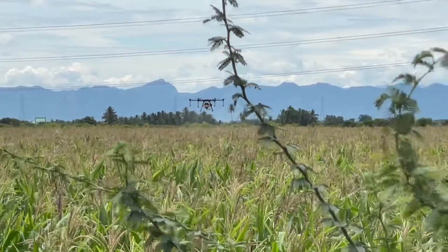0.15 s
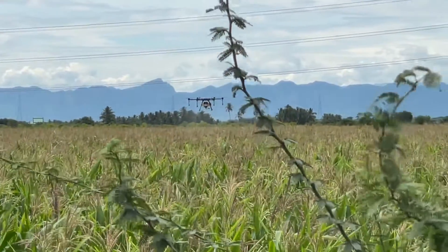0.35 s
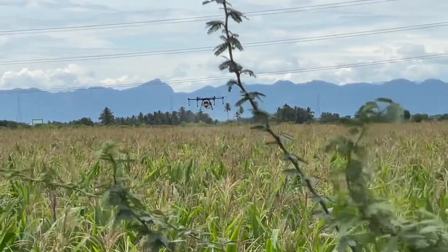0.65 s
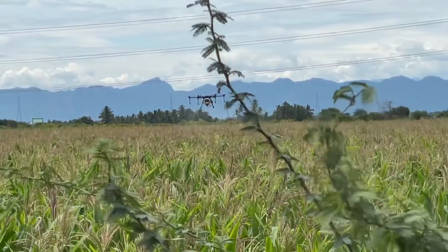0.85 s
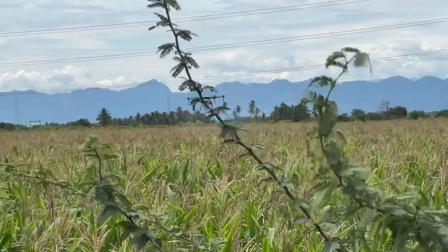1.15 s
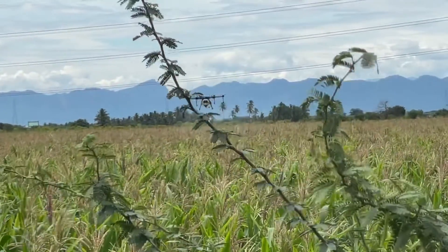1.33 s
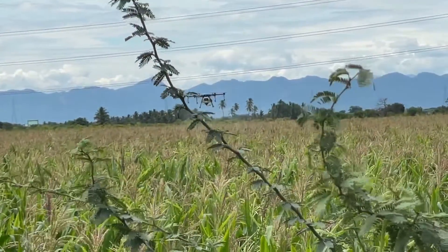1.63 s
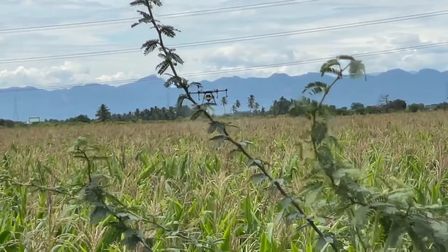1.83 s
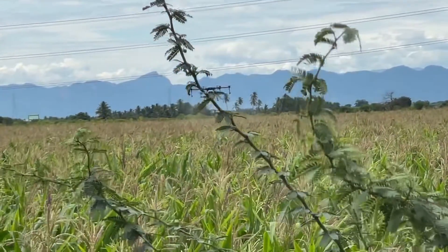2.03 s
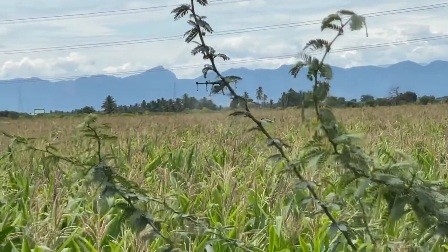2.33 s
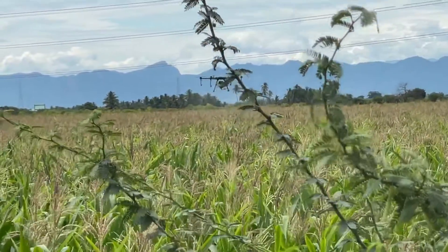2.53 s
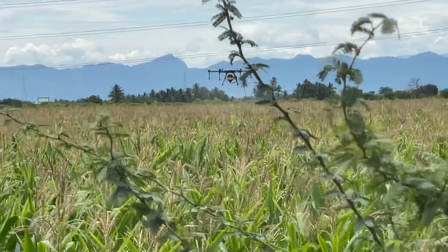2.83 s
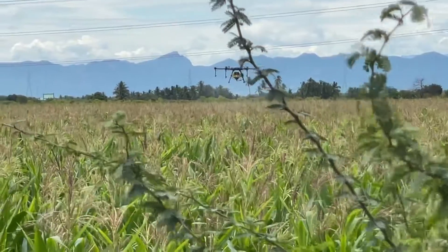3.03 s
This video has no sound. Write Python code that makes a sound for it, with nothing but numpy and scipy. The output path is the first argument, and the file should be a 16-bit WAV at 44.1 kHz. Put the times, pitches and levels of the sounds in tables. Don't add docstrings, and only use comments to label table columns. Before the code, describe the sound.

Distant drone rotors hum and hiss steadily, with close engine knocking, gusty wind and faint bird twitter.

```python
import sys
import numpy as np
from scipy import signal
from scipy.fft import rfft, irfft
from scipy.io import wavfile
from scipy.ndimage import uniform_filter1d

SR = 44100
rng = np.random.default_rng(int(sys.argv[2]) if len(sys.argv) > 2 else 0)


def store_wav(level_fs):
    pcm = np.round(np.clip(np.atleast_2d(level_fs), -1, 1) * 32767)
    wavfile.write(sys.argv[1], SR, pcm.T.astype(np.int16))


def undo_db(level):
    steps = np.asarray(level, float) / 20
    return 10 ** steps


N = 140238

CYCLE_S = .19623
LEAD = int(CYCLE_S * SR)
KNOCK_JITTER_S, KNOCK_SPREAD_DB, MODE_SPREAD_DB = .00006, 1.0, 1.2


def rms_one(x):
    return x / np.sqrt(np.mean(x ** 2) + 1e-20)


def drift(rate):
    r = np.exp(-80 * np.pi * rate / SR)
    slow = signal.lfilter([1], [1, -2 * r, r * r], rng.standard_normal(N // 40 + 2002))[2000:]
    return np.interp(np.arange(N) / 40, np.arange(len(slow)), rms_one(slow - slow.mean()))


def noise(spectrum, shared_db, own_db, rate):
    hz, db = np.transpose(spectrum)
    octave = np.log2(np.maximum(np.arange(N // 2 + 1) * SR / N, 1))
    white = rfft(rng.standard_normal((2, N)))
    coloured = white * undo_db(np.interp(octave, np.log2(hz), db, -99, -99))
    out, together = 0, drift(rate)
    for centre in np.arange(np.log2(hz[0]), np.log2(hz[-1]) + .5, .5):
        overlap = np.clip(1 - 2 * abs(octave - centre), 0, 1)
        band = irfft(coloured * overlap, N)
        out = out + band * undo_db(shared_db * together + own_db * drift(2 * rate))
    return rms_one(out)


def ring(clicks, hz, t60):
    r, w = undo_db(-60 / (t60 * SR)), 2 * np.pi * hz / SR
    return signal.lfilter([0, np.sin(w)], [1, -2 * r * np.cos(w), r * r], clicks + 1e-18)


def looped(rows, jitter_s, spread_db):
    s, db = np.transpose(rows)[:2]
    count = int(N / SR / CYCLE_S) + 2
    luck = rng.standard_normal((count, 2, len(s)))
    at = s + CYCLE_S * np.arange(count)[:, None] + jitter_s * luck[:, 0]
    return (np.abs(at) * SR).astype(int), db + spread_db * luck[:, 1]


def train(at, heights):
    clicks = np.zeros(N + SR)
    np.add.at(clicks, at.ravel(), np.ravel(heights))
    return clicks


def decay(clicks, time_s):
    swell = signal.lfilter([1], [1, -np.exp(-1 / (time_s * SR))], clicks)[LEAD:LEAD + N]
    return swell / swell.max()


def burst(rows, cycles):
    t, out = np.arange(N) / SR, np.zeros(N)
    for at, db, hz in rows:
        age = np.clip((t - at) * hz / cycles, 0, 1)
        envelope = np.sin(np.pi * age ** 0.62) ** 2
        out += undo_db(db - 3) * envelope * np.sin(2 * np.pi * cycles * age)
    return out


def bird():
    # (time [s], length [s], start pitch [Hz], end pitch [Hz], level [dB])
    twitter = [(.338, .022, 4100, 4200, -56), (.365, .025, 4850, 4300, -60), (.425, .022, 4350, 4500, -59),
               (.452, .058, 4750, 6450, -58), (.672, .02, 4100, 4150, -58), (.7, .022, 4750, 4350, -55),
               (.805, .018, 5200, 5550, -60), (.83, .018, 5900, 6300, -62), (1.015, .024, 4080, 4150, -55),
               (1.045, .024, 4900, 4450, -56), (1.1, .025, 4300, 4450, -59), (1.13, .035, 4950, 5100, -58),
               (1.17, .022, 6100, 6250, -59), (1.36, .02, 4050, 4100, -57), (1.475, .03, 5050, 5050, -56),
               (1.51, .03, 5900, 6400, -60), (1.49, .02, 4150, 4200, -57), (1.525, .022, 5000, 4950, -56)]
    t, out = np.arange(N) / SR, np.zeros(N)
    for at, length, from_hz, to_hz, db in twitter:
        age = np.clip((t - at) / length, 0, 1)
        turns = length * (from_hz * age + (to_hz - from_hz) * age ** 2 / 2)
        out += undo_db(db + 2.0) * np.sin(np.pi * age ** 1.64) * np.sin(2 * np.pi * turns)
    return out


def drone(swell):
    # (frequency [Hz], level per Hz [dB])
    hum_colour = [(45, -26), (90, -6), (200, -3), (300, -9), (480, -11.5), (600, -18), (800, -23),
                  (1300, -30)]
    # (frequency [Hz], level per Hz [dB])
    wash_colour = [(700, -6), (1100, 0.5), (1500, 0), (1850, -3), (2100, -6), (2700, -7), (3700, -8),
                   (4300, -14.5)]
    # (frequency [Hz], level per Hz [dB])
    hiss_colour = [(3500, -18), (4500, 2.5), (6500, -0.5), (8500, -0.5), (9800, 0.5), (11100, -1),
                   (11700, -14), (12400, -36)]
    # (time [s], level [dB])
    spray = [
        (0, 1),
        (.25, .5),
        (.5, -.5),
        (.95, -.5),
        (2.2, 0),
        (2.55, -.5),
        (2.8, 1),
        (2.95, 1.5),
        (3.18, 1),
    ]
    flicker_db, puff_db = .45, 4
    flow_db = np.interp(np.arange(N) / SR, *np.transpose(spray))
    hum = undo_db(-36.5) * noise(hum_colour, shared_db=.3, own_db=.4, rate=6.0)
    wash_level = undo_db(-50 + .8 * puff_db * swell)
    wash = wash_level * noise(wash_colour, flicker_db, 2 * flicker_db, rate=14.0)
    hiss_level = undo_db(-57.5 + flow_db + 0.97 * puff_db * swell)
    hiss = hiss_level * noise(hiss_colour, flicker_db, flicker_db, rate=17.0)
    return hum + wash + hiss


def wind():
    # (time [s], level [dB], sharpness [dB])
    gust = [(0, -26, 1.5), (.12, -28.5, -2), (.3, -26.5, -2), (.45, -28.5, 0.5), (.62, -27.5, -1),
            (1.0, -28.5, -3), (1.329, -29.5, 1.5), (1.38, -21, -2.5), (1.56, -27, 3.5), (1.7, -29, -1),
            (1.85, -28.5, 7.5), (2.0, -27.5, -0.5), (2.12, -26.5, -9), (2.22, -34.5, 4.5), (2.33, -43, 5),
            (2.7, -41.5, 5.5), (2.85, -42, 9.5), (3.18, -34.5, 0.5)]
    # (frequency [Hz], level per Hz [dB])
    low_colour = [(20, -40), (35, -17.5), (50, -2.5), (65, 1), (95, 0), (130, -8.5), (200, -14)]
    # (frequency [Hz], level per Hz [dB])
    edge_colour = [(60, -14), (110, -2), (160, 2), (250, -4.5), (400, -13.5), (700, -29)]
    # (time [s], peak level [dB], frequency [Hz])
    buffets = [(0.24, -16, 160), (0.255, -19, 190), (0.285, -13, 145), (0.309, -23, 177.8),
               (0.459, -27, 250), (0.53, -19, 151), (0.605, -16, 170.4), (0.769, -18, 202),
               (1.35, -17, 212), (1.384, -22, 179), (1.43, -20.5, 292), (1.489, -15.5, 180),
               (1.535, -17, 170), (1.665, -20.5, 167.4), (1.74, -19.5, 386), (1.74, -21, 200),
               (1.819, -14, 276), (1.845, -20.5, 196), (1.885, -26, 180), (1.95, -15, 172.4),
               (2.079, -15, 212.5), (2.083, -22.5, 463), (2.086, -19, 289.4), (2.084, -11, 109.7),
               (2.206, -17, 180), (2.25, -19.5, 207), (2.274, -18.5, 186), (2.726, -21, 226)]
    # (time [s], peak level [dB], frequency [Hz])
    surges = [(0.163, -13.5, 92), (0.252, -14.5, 82.3), (0.301, -18, 58.6), (0.446, -14, 80.5),
              (0.515, -13.5, 96.7), (1.039, -21, 68.2), (1.354, -14, 88.5), (1.384, -10.5, 80.7),
              (1.477, -8, 89), (1.518, -14, 59.8), (1.615, -12.5, 73), (1.74, -14, 59.6),
              (2.046, -14.5, 88.2), (2.124, -18.5, 96)]
    low_flicker_db, edge_flicker_db, evenness = 1.8, 1.6, 0.22
    s, level_db, sharp_db = np.transpose(gust)
    t = np.arange(N) / SR
    level_db, sharp_db = np.interp(t, s, level_db), np.interp(t, s, sharp_db)
    low = noise(low_colour, low_flicker_db, low_flicker_db, rate=4.3)
    power = uniform_filter1d(low[0] ** 2, size=2500)
    low = undo_db(level_db) * low / (power + 0.022) ** (evenness / 2)
    mean_db = level_db.mean()
    edge_db = mean_db + 0.66 * (level_db - mean_db) - 7 + sharp_db
    out = low + undo_db(edge_db) * noise(edge_colour, edge_flicker_db, edge_flicker_db, rate=5.7)
    out[0] += burst(buffets, cycles=2.8) + burst(surges, cycles=3.98)
    return out


def valve_puffs():
    # (time in cycle [s], level [dB])
    valves = [
        (.003, -6),
        (.019, -1),
        (.051, 0),
        (.064, -4),
        (.1155, -1),
        (.131, -6),
        (.149, 0),
        (.157, -3),
        (.181, -2),
    ]
    at, db = looped(valves, KNOCK_JITTER_S, KNOCK_SPREAD_DB)
    return decay(train(at, undo_db(db)), time_s=0.014)


def valve_gear():
    # (time in cycle [s], level [dB])
    contacts = [(.001, 5), (.0105, 1), (.0225, -3), (.0295, -4), (.052, -7), (.0595, 6.5), (.071, -7),
                (.092, -1), (.119, -16), (.128, 3), (.136, -3), (.1505, 4.5), (.155, -4.5), (.164, -17),
                (.193, -18)]
    # (frequency [Hz], level [dB], t60 [s])
    cover = [
        (2050, 0, .11),
        (2130, 0, .1),
        (2306, -4, .07),
        (2490, -4, .06),
        (3570, -12, .03),
    ]
    at, db = looped(contacts, .0003, KNOCK_SPREAD_DB)
    ticks = 0
    for hz, level_db, t60 in cover:
        own_db = rng.normal(0, MODE_SPREAD_DB, db.shape)
        ticks = ticks + ring(train(at, undo_db(db + level_db + own_db)), hz, t60)
    return undo_db(-59.5) * rms_one(ticks[LEAD:LEAD + N])


def exhaust():
    # (time in cycle [s], level [dB])
    firings = [
        (.054, -3.5),
        (.119, 4),
        (.185, 1),
        (.02, -3),
        (.088, -3),
        (.146, -1.5),
    ]
    # (frequency [Hz], level [dB], t60 [s])
    modes = [(94.4, 2, 0.55), (197, 2, 0.31), (234, -3, 0.33), (258.3, -1, 0.33), (299, -5.5, 0.14),
             (366.5, -3.5, 0.37), (398.4, -2, 0.61), (436.2, -1.5, 0.49), (470, -4.5, 0.57),
             (491.4, -4, 0.11)]
    at, db = looped(firings, jitter_s=.0001, spread_db=1.0)
    fire, pipe = train(at, undo_db(db)), 0
    for k, (hz, level_db, t60) in enumerate(modes):
        pipe = pipe + (-1) ** k * undo_db(level_db) * ring(fire, hz, t60)
    pipe = signal.lfilter([.1], [1, -.9], pipe)
    return undo_db(-39.5) * rms_one(pipe[LEAD:LEAD + N])


def casing():
    # (time in cycle [s], level [dB], extra of low, of middle, of high modes [dB])
    knocks = [(.0015, -7.5, 1, 10.5, 4), (0.012, -9.5, 8, 2, 2), (.030, -11.5, 14, 0, -8),
              (0.0558, 1, -0.5, 4.5, -3), (0.0594, -4.5, 8.5, 2, 0), (.0635, -2, -3, -8, 10),
              (0.0703, -6.5, -6, 0, 3), (0.08, -16, 0, -2, -7), (.087, -10.5, 4, 4, -2),
              (0.1163, 3.5, -5, -3, -8), (0.1193, -1, -2, 5.5, 3), (0.126, -7.5, 10.5, 11.5, -7),
              (0.1332, -6.5, -4, 10, 11), (0.1354, -8.5, 2, 6, 7), (.149, -22, 0, 0, -4),
              (.160, -17, 6, 5, 0), (0.1821, -5.5, -12, 0, -6), (.1865, 0, -3, 0, -7), (.192, -3, 1, 0, -1)]
    # (frequency [Hz], level [dB], t60 [s])
    block = [
        (660, -1, 0.04),
        (1008, -5, 0.055),
        (1110, -4, 0.065),
        (1210, 2.5, 0.07),
        (1432, -4, 0.03),
    ]
    # (frequency [Hz], level per Hz [dB])
    rattle_colour = [(700, -13), (1200, 2), (1500, -7), (2800, -16)]
    at, db = looped(knocks, KNOCK_JITTER_S, KNOCK_SPREAD_DB)
    low_db, middle_db, high_db = np.transpose(knocks)[2:]
    knock = 0
    for k, (hz, level_db, t60) in enumerate(block):
        own_db = rng.normal(0, MODE_SPREAD_DB, db.shape)
        if hz < 800:
            extra_db = low_db
        elif hz < 1150:
            extra_db = middle_db
        else:
            extra_db = high_db * (hz > 1300)
        knock = knock + (-1) ** k * ring(train(at, undo_db(db + own_db + level_db + extra_db)), hz, t60)
    shake = decay(train(at, undo_db(db)), time_s=0.0012)
    rattle = rms_one(shake * noise(rattle_colour, shared_db=-3.5, own_db=4.0, rate=3.8)[0])
    return undo_db(-46.5) * rms_one(knock[LEAD:LEAD + N]) + undo_db(-52.5) * rattle


def engine():
    return casing() + exhaust() + valve_gear()


def scene():
    out = drone(valve_puffs()) + wind()
    out[0] += engine() + bird()
    return out


def low_pass(x):
    return signal.sosfilt(signal.butter(12, 12200, fs=SR, output="sos"), x)


def record(dry):
    # (frequency [Hz], phase [rad])
    channel_phase = [(0, -0.5), (1300, 2), (1750, 3.0), (1950, 5.5), (2800, 7.0), (3600, 6.5), (5000, 6.5)]
    # (frequency [Hz], phase [rad])
    top_phase = [(5300, 0), (7500, 0), (7600, .35), (8250, .35), (8300, 0), (8870, 0), (8950, -.6),
                 (9500, -2.05), (10200, -3.14), (11500, -5.6), (11600, -2 * np.pi)]
    # (frequency [Hz], level [dB])
    channel_balance = [(0, 0), (450, 2), (750, -1.5), (1300, -4), (1800, 4), (2600, -5), (3200, 0.5),
                       (4000, -0.5)]
    # (frequency [Hz], likeness [0-1])
    channel_likeness = [(0, 1), (150, .92), (350, .82), (700, .72), (1200, 0.66), (1750, 0.3), (2200, 0.8),
                        (3500, .9), (4600, .95)]
    mono_hz, top_edge_hz, top_open = 5300, 11730, .8
    wide = np.pad(dry, [(0, 0), (2000, 2000)], mode="reflect")
    size = wide.shape[1]
    hz = np.arange(size // 2 + 1) * SR / size
    tables = (channel_phase, top_phase, channel_balance)
    phase, top, balance_db = (np.interp(hz, *np.transpose(table)) for table in tables)
    phase = np.where(hz < mono_hz, phase, 2 * np.pi + top)
    alike = np.clip(np.interp(hz, *np.transpose(channel_likeness + [(mono_hz, 1)])), 0, 1)
    common, apart = rfft(wide) * np.sqrt([(1 + alike) / 2, (1 - alike) / 2])
    turn = np.exp(.5j * phase) * undo_db(balance_db * (hz < mono_hz) / 2)
    channels = np.array([(common + apart) * turn, (common - apart) / turn])
    body = irfft(channels * (hz < top_edge_hz), size)[:, 2000:-2000]
    edge = irfft(channels * (hz >= top_edge_hz), size)[:, 2000:-2000]
    is_open = drift(10) + np.linspace(-1, 1, N) > top_open
    gate = uniform_filter1d(1. * is_open, size=600)
    return low_pass(body + 2 * gate * edge)


dry = scene()
out = record(dry)
store_wav(out)
```